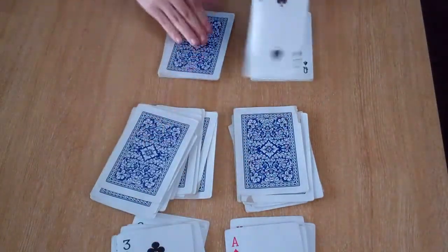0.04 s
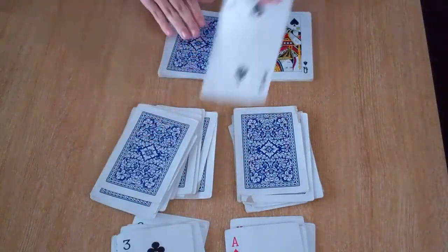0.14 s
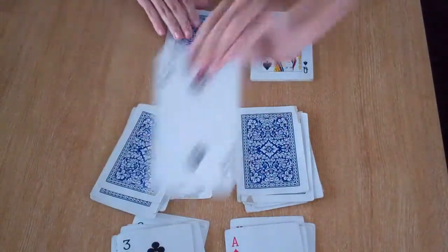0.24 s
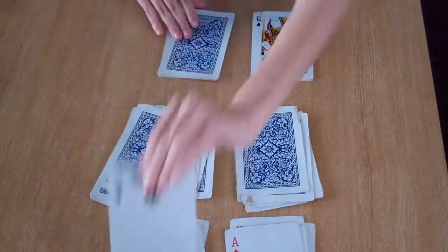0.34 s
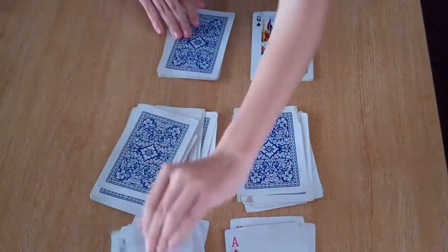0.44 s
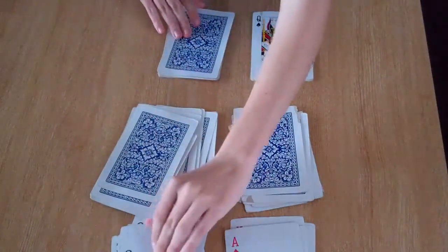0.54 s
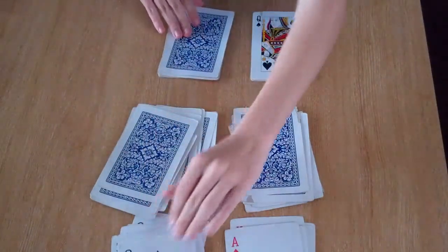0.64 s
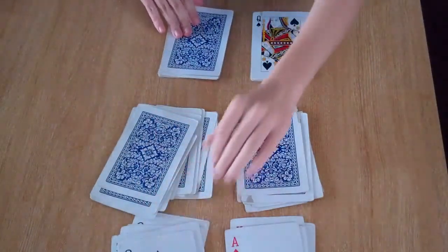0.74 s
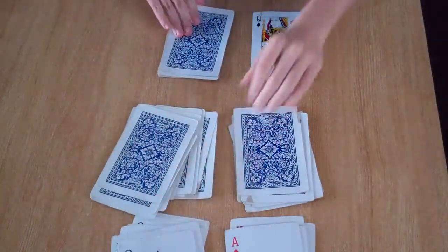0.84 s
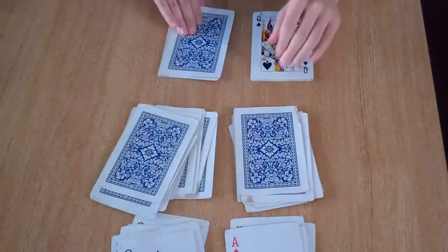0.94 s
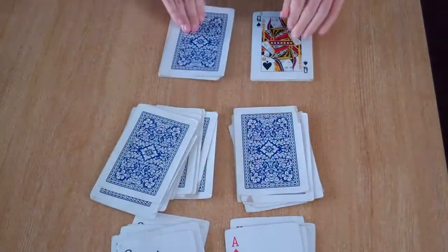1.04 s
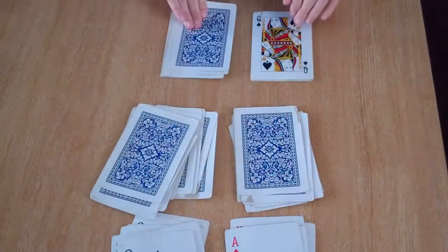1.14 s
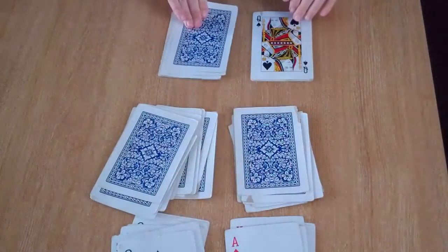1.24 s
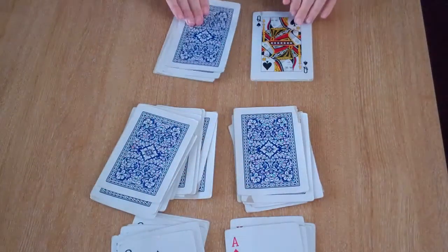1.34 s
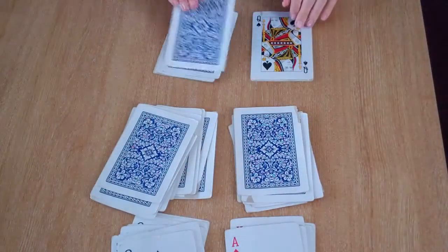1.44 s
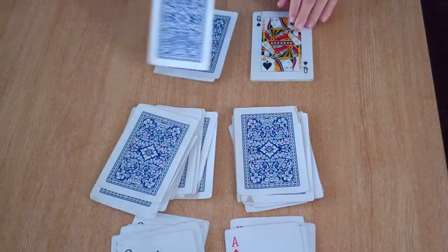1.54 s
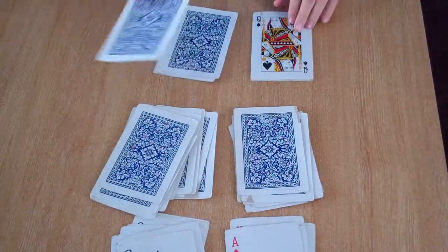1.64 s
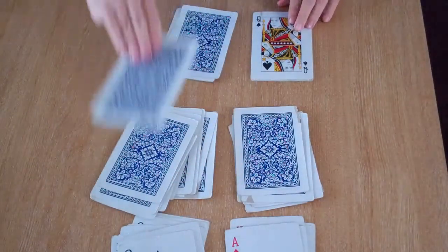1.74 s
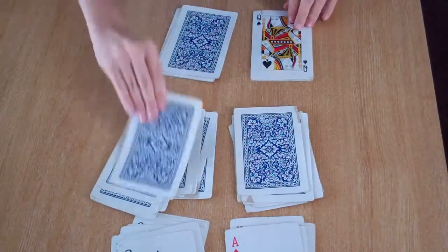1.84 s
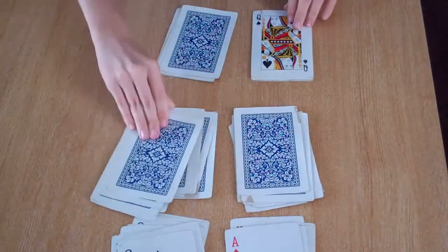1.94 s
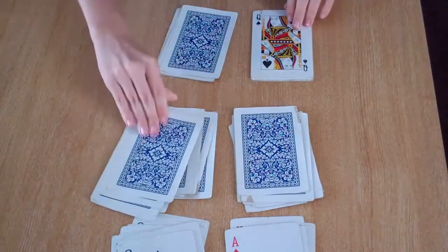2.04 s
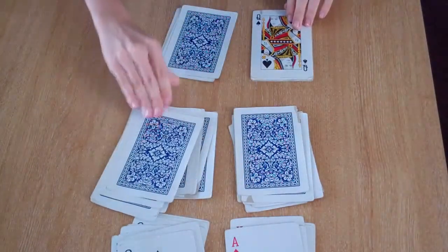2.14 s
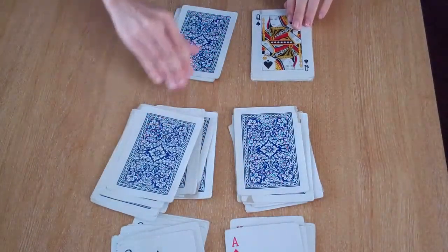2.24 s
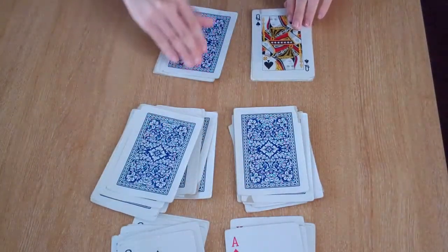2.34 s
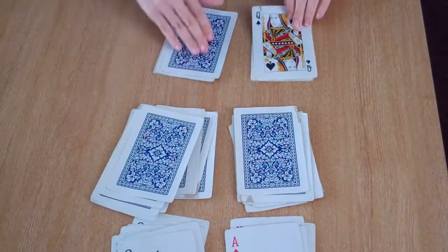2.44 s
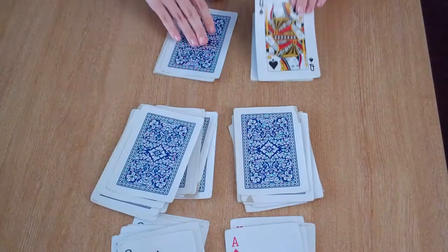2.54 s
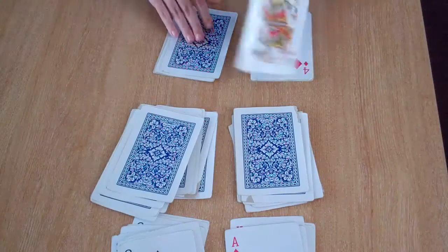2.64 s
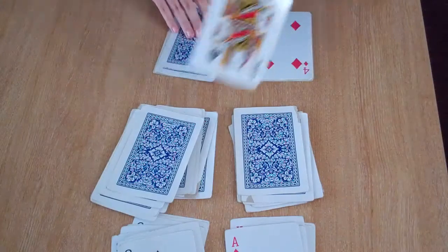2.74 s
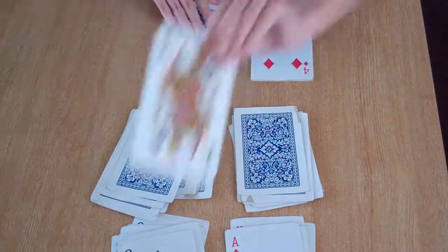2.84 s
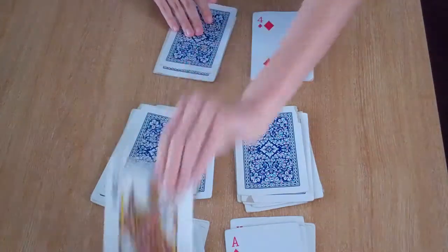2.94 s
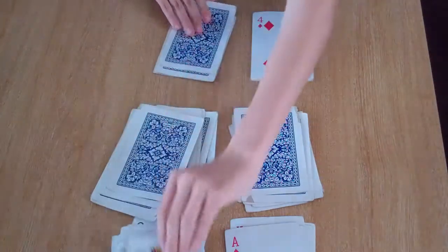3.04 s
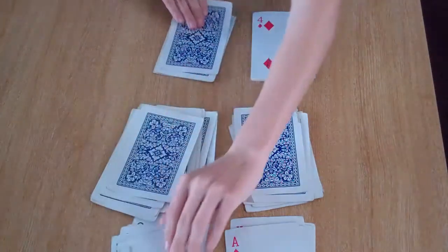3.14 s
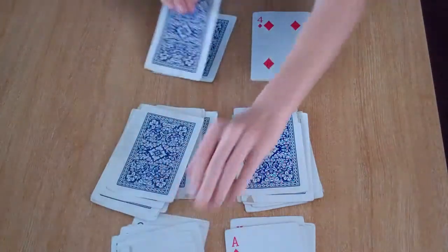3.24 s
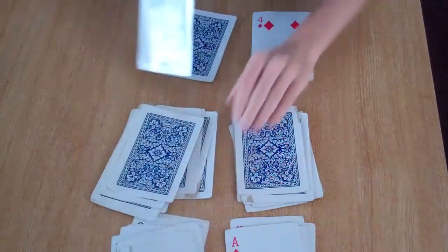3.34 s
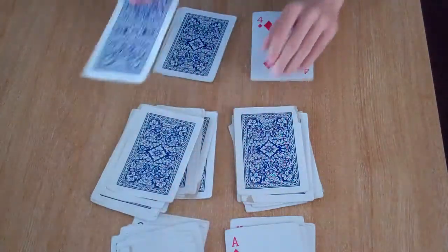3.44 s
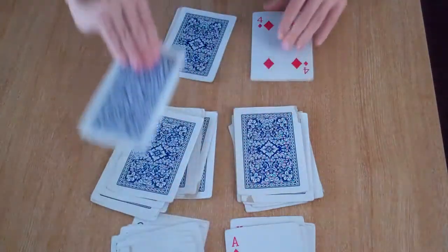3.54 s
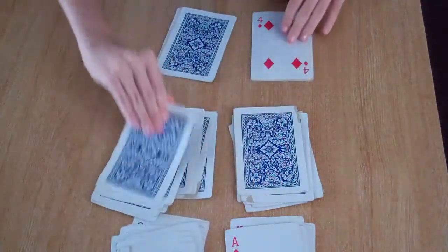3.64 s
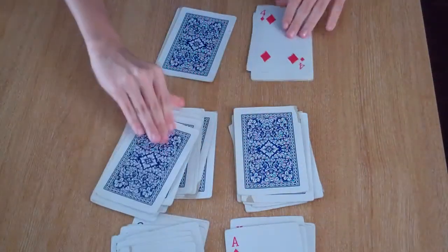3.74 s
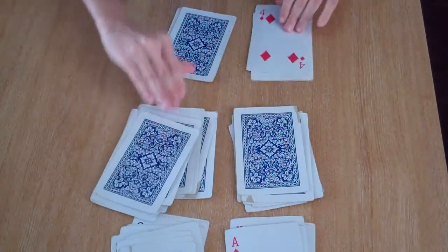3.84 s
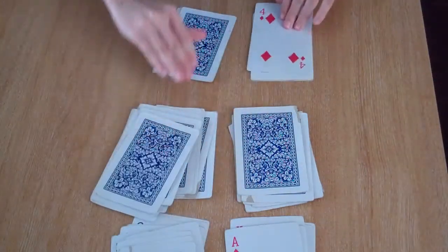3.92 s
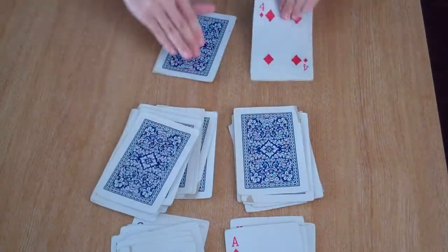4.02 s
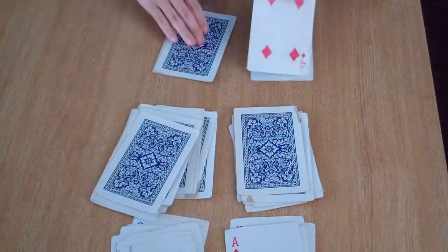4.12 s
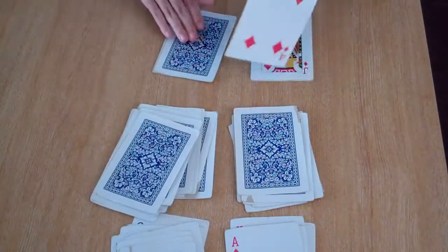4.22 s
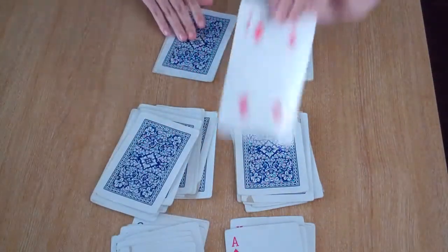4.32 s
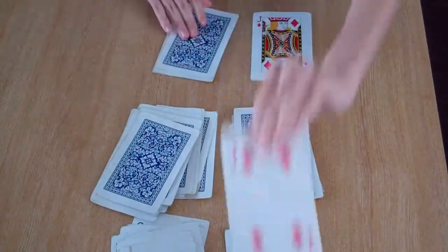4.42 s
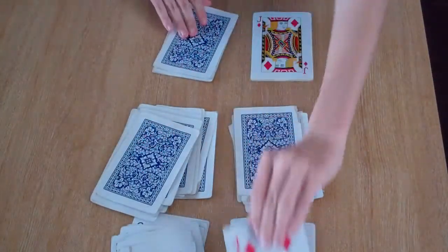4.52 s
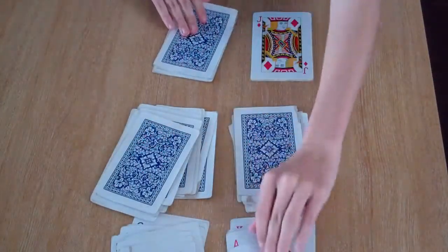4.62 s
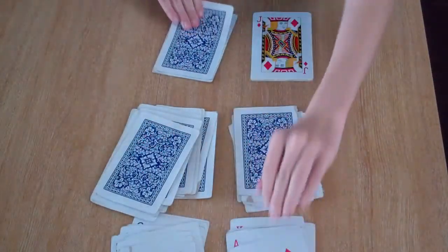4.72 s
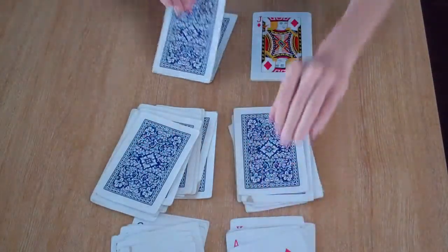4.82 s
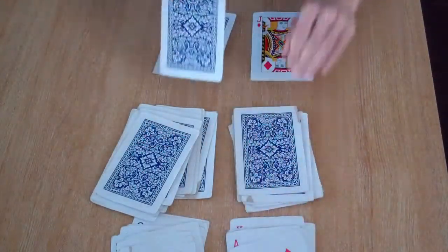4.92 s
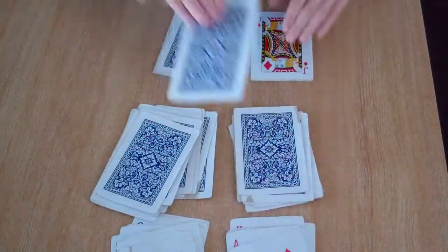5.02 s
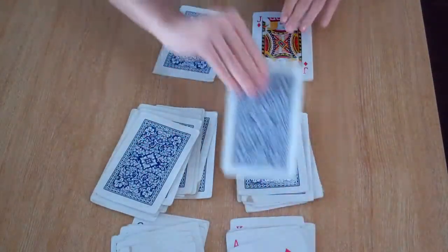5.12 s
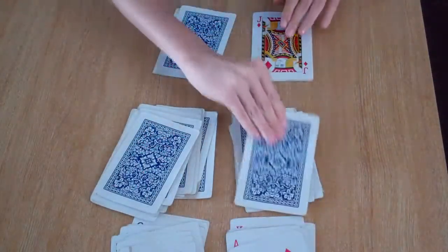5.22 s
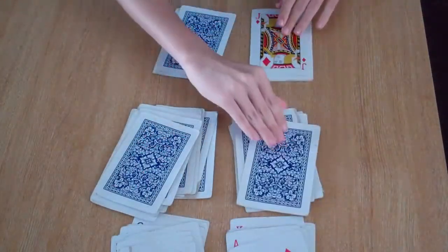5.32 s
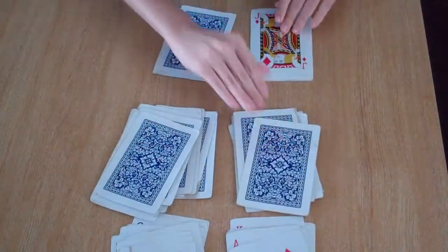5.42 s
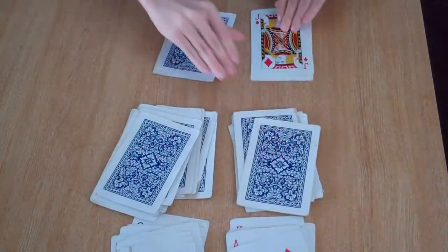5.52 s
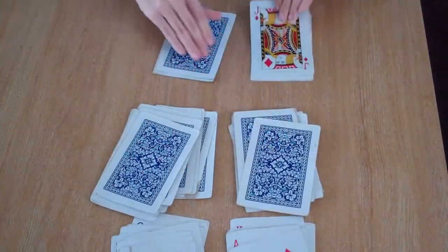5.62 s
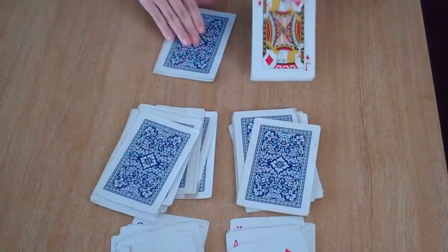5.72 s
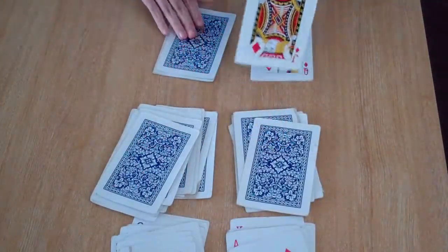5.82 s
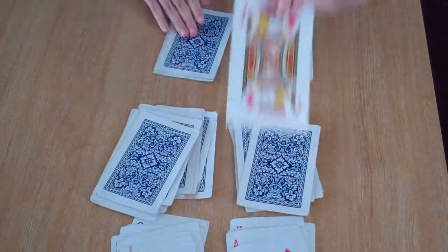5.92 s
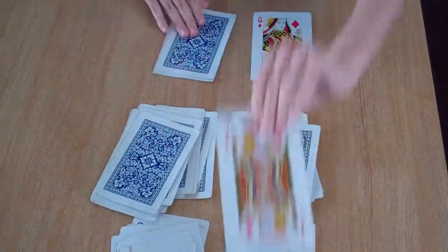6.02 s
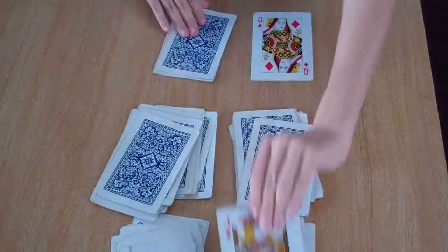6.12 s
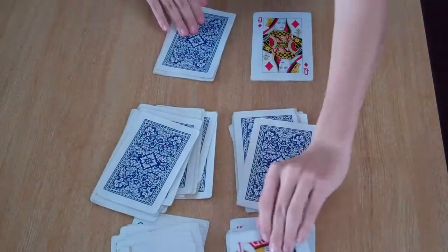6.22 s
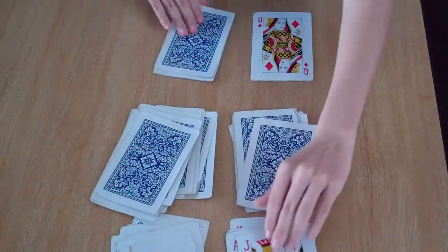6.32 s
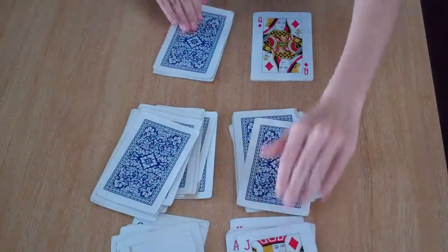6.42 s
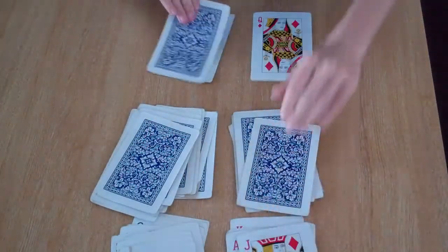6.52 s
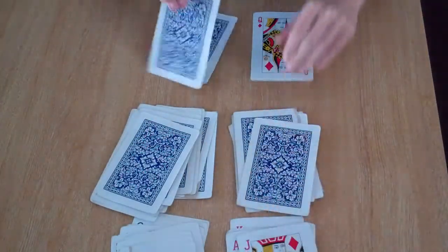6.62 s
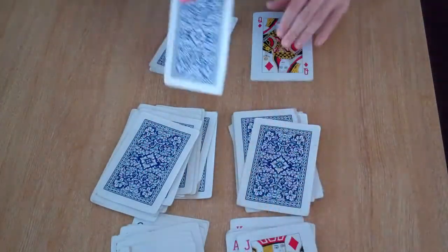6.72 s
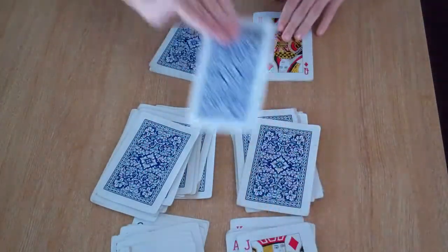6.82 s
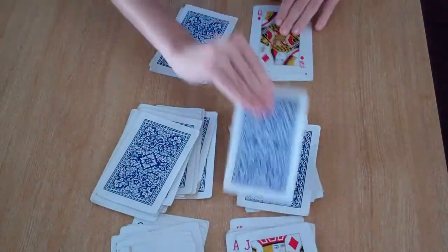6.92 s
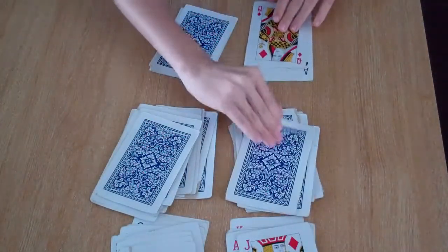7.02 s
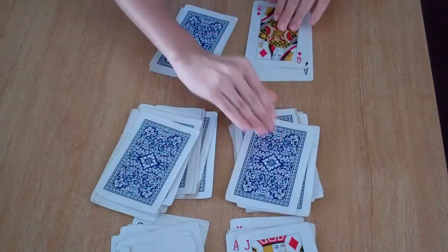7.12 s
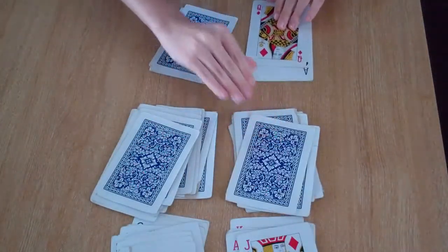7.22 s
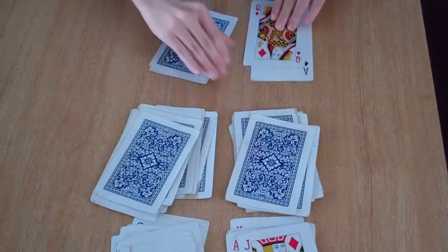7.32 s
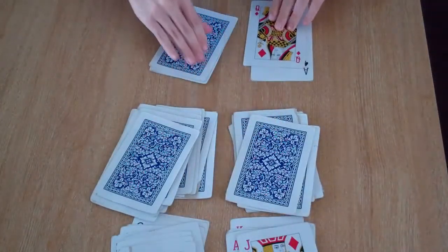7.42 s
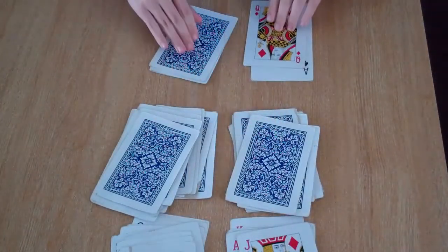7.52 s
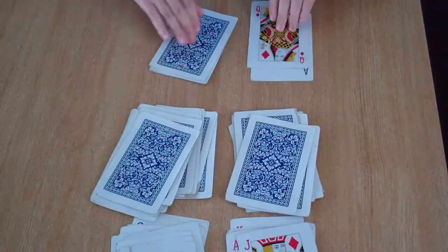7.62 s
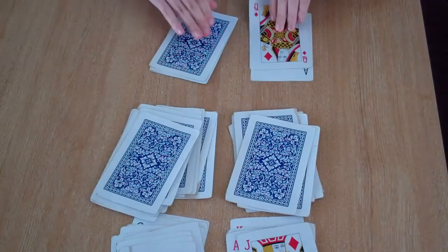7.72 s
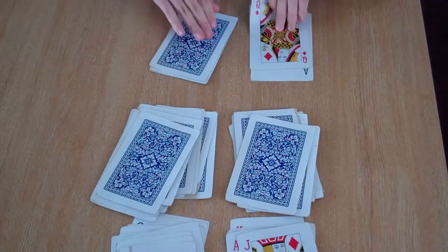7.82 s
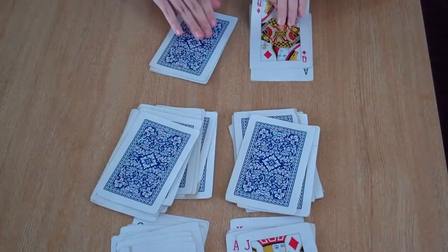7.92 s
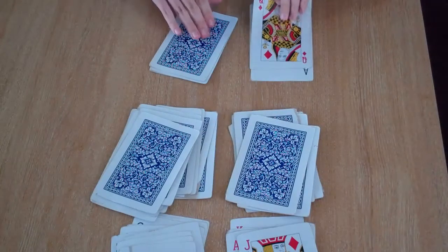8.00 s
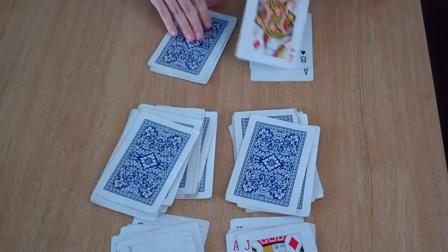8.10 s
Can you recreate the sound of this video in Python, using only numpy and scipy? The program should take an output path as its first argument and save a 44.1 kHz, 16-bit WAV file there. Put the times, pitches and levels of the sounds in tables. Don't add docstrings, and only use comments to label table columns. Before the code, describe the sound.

In a small quiet room, playing cards are laid on piles on a wooden table, close to a phone microphone in slightly uneven stereo. Steady soft hiss and a faint appliance hum lie underneath. At 0.43 s a card snaps and slaps down, with a finger flick at 0.54. Faint rubbing follows at 1.1, then a lighter, several-part crackling slap at 1.87-1.95. Faint slides come at 2.5 and 2.6. At 3.03 a card lands with a heavier, low woody knock, then small ticks at 3.12. A sharp snap hits at 3.66, a firm full slap at 4.55 with a flick at 4.63, a lighter slap at 5.21, and the brightest, loudest crack at 6.14. A soft pat comes at 6.97, then papery scrapes and ticks at 7.85-7.98. Each hit has a very short room tail; the hiss dips after the slaps near 3.66 and 6.14, then slowly climbs back.

```python
import sys
import numpy as np
from scipy import signal
from scipy.fft import rfft, irfft, next_fast_len
from scipy.io import wavfile
from scipy.ndimage import uniform_filter1d

SR = 44100
rng = np.random.default_rng(int(sys.argv[2]) if len(sys.argv) > 2 else 0)


def ratio(d):
    e = np.asarray(d, float) / 20
    return 10 ** e


def int16_out(signal):
    q = np.round(np.clip(np.atleast_2d(signal).T, -1, 1) * 32767)
    wavfile.write(sys.argv[1], SR, q.astype(np.int16))


N = 359856


def unit(x):
    return x / np.sqrt(np.mean(x ** 2) + 1e-20)


def along(points, hz):
    f, v = np.transpose(points)
    return np.interp(np.log(hz + 1), np.log(f + 1), v)


def filtered(x, response):
    m = next_fast_len(x.shape[-1] + 4096)
    spectrum = rfft(x, m) * response(np.fft.rfftfreq(m, 1 / SR))
    return irfft(spectrum, m)[..., :x.shape[-1]]


def causal(points):
    cepstrum = irfft(np.log(ratio(along(points, np.fft.rfftfreq(1024, 1 / SR)))))
    cepstrum[1:512] *= 2
    cepstrum[513:] = 0
    return irfft(np.exp(rfft(cepstrum)))[:512]


def add(track, s, sound):
    track[max(round(s * SR), 0):][:len(sound)] += sound


def edge_snaps(events, t60_s, roughness):
    out, t = np.zeros(N + SR), np.arange(1500) / SR
    for s, db, low_db, top_db in events:
        crackle = roughness * rng.standard_normal(len(t)) * ratio(-60 * t / t60_s)
        crackle[0] = -1
        colour = [(300, low_db - 53), (800, low_db + 3.5), (1300, low_db + 2), (1900, low_db + 6),
                  (4000, 0), (8500, top_db - 6), (14000, top_db - 27)]
        snap = np.convolve(crackle, causal(colour))
        body = filtered(snap, lambda hz: (hz > 2500) & (hz < 6000))
        add(out, s, ratio(db - 1) * snap / np.abs(body).max())
    return out[:N]


def clean_snaps():
    # (time [s], peak level [dB], low part [dB], top part [dB])
    clean_edges = [(0.4276, -21.5, 1.5, 4.5), (0.43, -39, 4, -6), (1.8658, -38.5, -9, -6),
                   (1.8708, -26, 1.5, -8), (1.9078, -34.5, -17, -9), (1.91, -40, -15, -12),
                   (1.9202, -44, -1, -11), (1.9276, -35, -3.5, -4), (3.0311, -32, 12, 3),
                   (3.112, -40, -6, 9), (3.6563, -20.5, -5.5, 2), (4.5463, -24.5, -3, -1),
                   (4.6755, -52, -6, 5), (5.2055, -25.5, -4, -4.5), (6.1447, -14.5, -4.5, -8.5),
                   (6.3834, -52, -12, 1), (6.9719, -35.5, -6, -11)]
    return edge_snaps(clean_edges, t60_s=0.008, roughness=0.18)


def catching_snaps():
    # (time [s], peak level [dB], low part [dB], top part [dB])
    catching_edges = [(0.4249, -35, 7, -1), (0.5379, -25.5, -15.5, -11), (1.11, -42.5, -8, 3),
                      (1.8725, -28.5, 0, -20), (1.949, -43, -4, -5), (3.1206, -38, -9, 3),
                      (3.126, -35, 0, 5.5), (3.6584, -24, -14, -6), (4.5535, -25.5, -1, -18),
                      (5.208, -33, -1, -4), (6.1436, -51, 10, -9), (6.966, -54, -13, -1),
                      (7.8637, -36.5, -18, -5), (7.939, -38.5, -2.5, 5.5)]
    return edge_snaps(catching_edges, t60_s=0.011, roughness=1)


def rings(events):
    out, t = np.zeros(N + SR), np.arange(SR // 5) / SR
    for s, db, hz, t60_s in events:
        below, above = 1 - 0.18 * rng.uniform(0.17, 1), 1.143
        ring = np.sin(2 * np.pi * hz * t)
        ring += 0.24 * np.sin(2 * np.pi * hz * below * t)
        ring += 0.32 * np.sin(2 * np.pi * hz * above * t)
        onset = 1 - np.exp(-t / 0.00037)
        add(out, s, -ratio(db - 3 - 60 * t / t60_s) * onset * ring)
    return out[:N]


def face_slaps():
    # (time [s], peak level [dB], pitch [Hz])
    slap_rings = [(0.431, -46, 325), (0.4311, -32.5, 1210), (0.4352, -23.5, 682), (.444, -33, 855),
                  (1.866, -40.5, 820), (1.870, -29, 1860), (1.8711, -21.5, 3670), (1.88, -44, 1400),
                  (.4278, -28.5, 1890), (6.158, -32.5, 950), (3.0312, -31, 4680), (3.037, -24.5, 906),
                  (3.656, -30, 1340), (3.660, -32.5, 770), (4.546, -17, 1610), (4.5469, -22, 2210),
                  (4.5472, -22.5, 4940), (4.550, -21, 910), (4.553, -20.5, 1050), (4.555, -24, 1180),
                  (5.206, -25.5, 1280), (5.2061, -29, 2170), (5.209, -24.5, 800), (5.215, -27.5, 1540),
                  (6.1449, -19.5, 1780), (6.1449, -14.5, 5500), (6.151, -27, 1200), (6.153, -24.5, 1440),
                  (6.9727, -29, 818), (6.965, -51, 790)]
    return rings([(s, db, hz, 0.026 * (1000 / hz) ** 0.79) for s, db, hz in slap_rings])


def table_thuds():
    # (pitch [Hz], time to fall 60 dB [s])
    wood_modes = [(535, 0.049), (1105, 0.051), (1750, 0.042), (2290, 0.036)]
    mode_delays = [-.005, .003, -.006, -.006]
    # (time [s], level of first, second, third and fourth mode [dB])
    hand_thuds = [
        (.451, -50, -40, -42, -46),
        (1.885, -48, -52, -52, -52),
        (3.038, -26.5, -23.5, -27.5, -29),
        (3.662, -42.5, -39, -33.5, -50),
        (4.560, -33, -57, -27.5, -38),
        (5.218, -48, -42, -36, -41),
        (6.156, -41.5, -40, -47, -52),
    ]
    events = []
    for s, *levels in hand_thuds:
        for db, (hz, t60_s), delay in zip(levels, wood_modes, mode_delays):
            events.append((s + delay, db, hz, t60_s))
    return rings(events)


def friction(events):
    out, t = np.zeros(N + SR), np.arange(-2000, 9000) / SR
    for s, db, rise_s, fall_s, centre_hz, octaves in events:
        unevenness = unit(uniform_filter1d(rng.standard_normal(len(t)), size=24))
        grit = rng.standard_normal(len(t)) * ratio(4.5 * unevenness)

        def colour(hz):
            hump = np.exp(-.5 * (np.log2((hz + 1) / centre_hz) / octaves) ** 2)
            less_bass = hz ** 2 / (hz ** 2 + 800 ** 2)
            return (hump + 0.066) * less_bass / (1 + (hz / 10500) ** 6)

        stroke = np.exp(-np.where(t < 0, np.abs(t / rise_s), t / fall_s))
        add(out, s + t[0], ratio(db) * stroke * unit(filtered(grit, colour)))
    return out[:N]


def finger_flicks():
    # (time of peak [s], rms level [dB], rise [s], centre [Hz], width [octaves])
    slips = [(0.051, -56.5, .011, 8800, 0.13), (0.535, -44, 0.0086, 3000, 0.76),
             (.5389, -41.5, .003, 4030, 0.33), (.539, -43, 0.0017, 12300, 0.36),
             (1.951, -44.5, 0.01, 5000, 0.94), (3.121, -41, 0.0022, 5430, 0.12),
             (3.126, -48.5, 0.011, 3300, 0.43), (3.656, -52, 0.0074, 1900, 0.85),
             (4.631, -49, 0.0058, 3600, 0.9), (4.637, -41.5, 0.0022, 2940, 0.31),
             (5.205, -43, 0.0019, 1600, 0.46), (5.317, -54, 0.024, 1800, 1.2),
             (5.318, -53.5, 0.01, 4200, 0.81), (6.296, -48, 0.0056, 2770, 0.12),
             (6.2961, -50.5, 0.0058, 4000, 0.15), (7.060, -58.5, 0.046, 2000, 1.15),
             (7.067, -55.5, 0.011, 5100, 0.77), (7.864, -47, .002, 4300, 0.63),
             (7.980, -52, 0.032, 4000, 0.6)]
    return friction([(s, db, rise_s, 0.28 * rise_s, *band) for s, db, rise_s, *band in slips])


def drags_and_rushes():
    # (time of peak [s], rms level [dB], fall [s], centre [Hz], width [octaves])
    fading_strokes = [(.428, -52, 0.0041, 3000, 1.3), (1.115, -59.5, 0.068, 8800, 0.16),
                      (1.124, -58.5, 0.039, 4200, 0.41), (1.294, -63.5, 0.027, 8700, .4),
                      (2.480, -58, 0.022, 7400, 0.67), (2.635, -59, .014, 7900, 0.51),
                      (3.034, -46.5, 0.0099, 4000, 1.4), (3.158, -62, 0.049, 8150, .6),
                      (3.669, -58, 0.018, 4500, 1.1), (3.694, -56, 0.026, 4000, 0.76),
                      (5.220, -52, 0.0093, 4900, 0.8), (6.158, -61, 0.0075, 4500, 0.86), (6.975, -55, .015, 3900, 1),
                      (7.848, -54.5, .025, 4300, 0.62), (7.871, -56, 0.038, 3800, 0.28),
                      (7.871, -59, 0.042, 6340, 0.51), (7.943, -50.5, 0.028, 3670, 0.28),
                      (7.946, -51, 0.02, 8000, 0.15), (7.950, -50.5, 0.024, 920, 1.1)]
    return friction([(s, db, 0.0044, fall_s, *band) for s, db, fall_s, *band in fading_strokes])


def room(x):
    # (frequency [Hz], time to fall 60 dB [s])
    tail_times = [(300, 0.24), (1000, 0.14), (3000, 0.19), (10000, 0.27)]
    # (frequency [Hz], level [dB])
    tail_levels = [(250, -4.5), (600, -6.5), (1200, -7.5), (2200, -13), (4000, -14), (6000, -17.5),
                   (9000, -12.5)]
    out, step = np.zeros((2, N + SR)), SR // 3
    for i in range(0, N, step):
        hz, t, z = signal.stft(rng.standard_normal((2, SR // 4)), SR, nperseg=128)
        z[1] = 0.97 * z[0] + .5 * z[1]
        fade = ratio(-60 * t / along(tail_times, hz)[:, None])
        tail = signal.istft(z * fade, SR, nperseg=128)[1]
        tail = tail / np.linalg.norm(tail[0])
        wet = signal.fftconvolve(x[None, i:i + step], tail, axes=1)
        out[:, i + 130:][:, :wet.shape[1]] += wet
    return filtered(out[:, :N], lambda hz: ratio(along(tail_levels, hz)))


def bumps():
    # (time [s], level [dB])
    hand_rests = [
        (.08, -66),
        (1.97, -57),
        (3.16, -58),
        (5.27, -61),
        (6.15, -60),
    ]
    out, t = np.zeros(N + SR), np.arange(SR // 4) / SR
    for s, db in hand_rests:
        swell = (t / 0.022) * np.exp(1 - t / 0.018)
        add(out, s - .03, ratio(db) * swell * np.sin(2 * np.pi * 65 * t))
    return out[:N]


def background():
    # (frequency [Hz], level per Hz [dB])
    hiss_colour = [(20, -12), (60, -5), (120, -7), (250, -5), (600, -6), (900, -8.5), (2500, -12),
                   (5850, -16.5), (8500, -23), (10200, -27), (11500, -35), (12700, -33.5), (15000, -62)]
    # (frequency [Hz], likeness [1 = same])
    hiss_likeness = [(60, 0.27), (130, 0.22), (290, 0.57), (640, 0.2), (1410, 0.18), (3100, 0.089),
                     (6820, 0.031), (15000, 0.12)]
    # (pitch [Hz], level over the hiss [dB], width [Hz])
    hum_lines = [(120, -14, 9), (208, -11.5, 3), (301, -21, 6), (625, -21, 12), (6557, -30, 8),
                 (7852, -28, 3), (7882, -29, 3)]

    def mid_side_gain(hz):
        turn = np.arccos(np.clip(along(hiss_likeness, hz), -1, 1)) / 2
        return ratio(along(hiss_colour, hz)) * [np.cos(turn), np.sin(turn)]

    mid, side = filtered(rng.standard_normal((2, N)), mid_side_gain)
    sound = unit(np.array([mid + side, mid - side]))
    t = np.arange(N) / SR
    for hz, db, width_hz in hum_lines:
        waver = filtered(rng.standard_normal((2, N)), lambda f: 1 / (1 + (f / width_hz) ** 2))
        hum = (4 + unit(waver[0])) * np.sin(2 * np.pi * hz * t)
        hum += unit(waver[1]) * np.cos(2 * np.pi * hz * t)
        sound = sound + ratio(db) * unit(hum)
    floor_db = -57.5 + 2.5
    return ratio(floor_db + ducking()) * ratio([[1.3], [-1.3]]) * sound


def ducking():
    # (time [s], depth [dB], hold [s])
    dives = [
        (.45, 1, .3),
        (3.61, 5.5, 1.5),
        (6.094, 5.5, 0.72),
    ]
    dive_s, settle_s, recover_db_per_s = 0.14, 0.18, 5.5
    t = np.arange(N) / SR
    gain_db = np.zeros(N)
    for s, db, hold_s in dives:
        settled_s = dive_s + settle_s
        release_s = max(hold_s, settled_s + .01)
        times = [0, dive_s, settled_s, release_s, release_s + db / recover_db_per_s]
        overshoot_db = 2.5 * db / 5
        gain_db -= np.interp(t - s, times, [0, db + overshoot_db, db, db, 0])
    return gain_db


def scene():
    # (frequency [Hz], level [dB])
    port_levels = [(200, 2.5), (2500, 3), (4400, 5), (8000, 6.5), (11000, 11.5), (13000, -5)]
    # (frequency [Hz], phase [radians])
    port_lags = [(6500, 0.11), (7600, 1.5), (9000, 0.7), (12000, 1.65)]
    cards = clean_snaps() + catching_snaps() + face_slaps() + table_thuds() + finger_flicks() + drags_and_rushes()
    cards = filtered(cards, lambda hz: 1j * hz / (1j * hz + 200))
    side = np.array([[.5], [-.5]])

    def ports(hz):
        return ratio(side * along(port_levels, hz)) * np.exp(-1j * side * along(port_lags, hz))

    return filtered(cards + room(cards) + bumps(), ports) + background()


def band_limit(x):
    return signal.sosfilt(signal.butter(12, 16330, fs=SR, output="sos"), x)


def record(dry):
    # (frequency [Hz], level [dB])
    capsule = [(11000, 0), (13500, -5), (15500, -17), (16500, -25)]
    mix = filtered(dry, lambda hz: ratio(along(capsule, hz)))
    return band_limit(mix)


dry = scene()
out = record(dry)
int16_out(out)
```